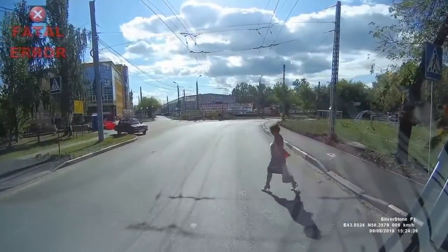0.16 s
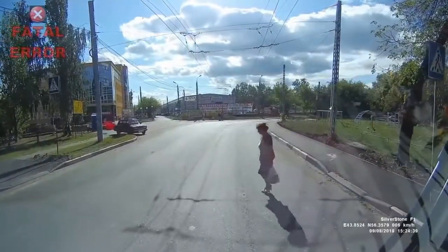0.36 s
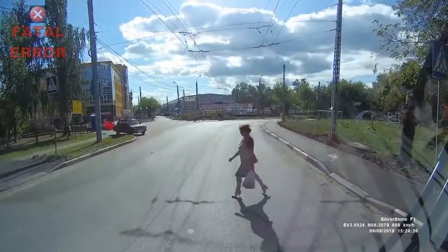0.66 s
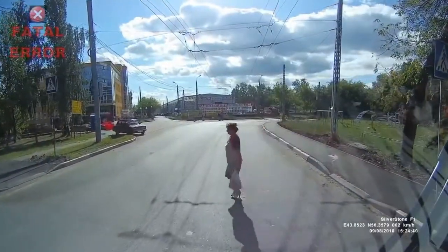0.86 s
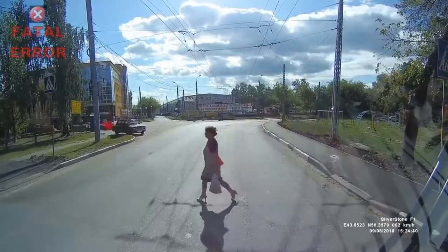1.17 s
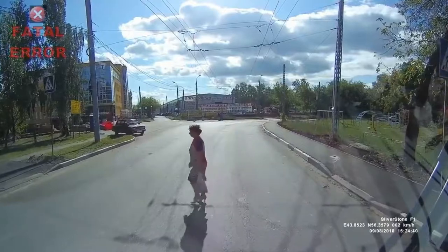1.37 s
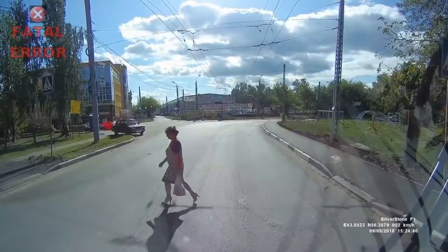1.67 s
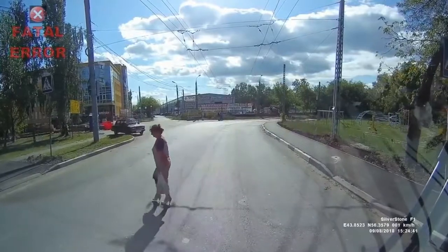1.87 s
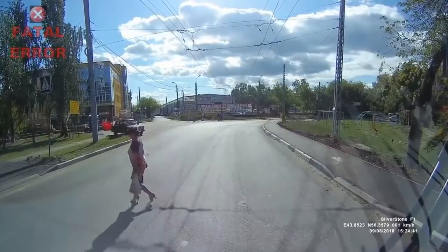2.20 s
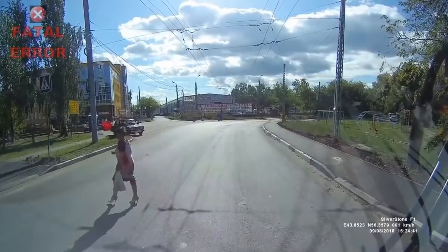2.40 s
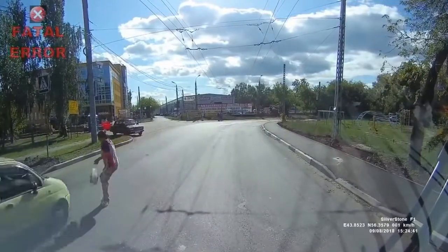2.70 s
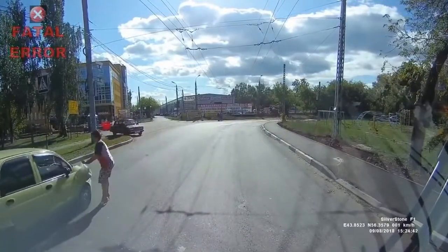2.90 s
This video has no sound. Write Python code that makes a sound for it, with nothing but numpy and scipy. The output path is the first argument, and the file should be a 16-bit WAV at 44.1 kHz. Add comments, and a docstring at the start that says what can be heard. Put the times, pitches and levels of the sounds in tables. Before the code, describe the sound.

Tyres squeal as a nearby car brakes hard, heard over an idling engine from inside.

```python
"""Inside a car that has all but stopped, a four-cylinder engine idles, throbbing in the cab;
loose things knock softly in the first second. At 1.4 s the engine starts a brief rev.
From 2 s, as it sinks back, another car brakes hard alongside: two skidding tyres stick and slip,
squealing at neighbouring, unsteady pitches, echoed by the street.
Near 2.9 s the lower one ends in a falling chirp while the higher one squeals on."""
import sys
import numpy as np
from scipy import signal
from scipy.fft import rfft, irfft, next_fast_len
from scipy.io import wavfile
from scipy.ndimage import map_coordinates

SR = 44100
rng = np.random.default_rng(int(sys.argv[2]) if len(sys.argv) > 2 else 0)


def store_pcm(level_fs):
    """Save levels as 16-bit WAV."""
    pcm = np.round(np.clip(level_fs, -1, 1) * 32767).astype(np.int16)
    wavfile.write(sys.argv[1], SR, np.atleast_2d(pcm).T)


N = 134505
TIME = np.arange(N) / SR


def amp(db):
    """Decibels to gain."""
    return 10 ** (np.asarray(db) / 20)


def unit(x):
    """Scale to rms 1."""
    return x / np.sqrt(np.mean(x ** 2) + 1e-20)


def curves(rows):
    """One value per sample for each column after the time."""
    times, *columns = np.transpose(rows)
    return [np.interp(TIME, times, column) for column in columns]


def wobble(rate):
    """A smooth random curve, rate knots a second."""
    return map_coordinates(rng.standard_normal(4096), [TIME * rate], mode="wrap")


def filtered(x, response):
    """EQ x with a gain given as a function of frequency."""
    size = next_fast_len(N + SR // 2)
    return irfft(rfft(x, size) * response(np.fft.rfftfreq(size, 1 / SR)), size)[:N]


def high_cut(x, cutoff_hz):
    """A very steep low-pass."""
    return filtered(x, lambda hz: 1 / np.sqrt(1 + (hz / cutoff_hz) ** 60))


def noise(spectrum):
    """Noise of rms 1 coloured by (f/Hz, level/dB) points."""
    freqs, db = np.transpose(spectrum)
    white = rng.standard_normal(N)
    return unit(filtered(white, lambda hz: amp(np.interp(np.log(hz + 1), np.log(freqs), db))))


# small knocks and rattles in the cab: t/s, f/Hz, spread/octaves, level/dB, spread/s
KNOCKS = [(.513, 330, .7, -38, .005), (.529, 600, .35, -45, .008), (.821, 3600, .2, -52, .006),
          (.825, 750, .35, -46, .008)]


def knocks():
    """Loose things in the cab shift with a short puff of noise each."""
    out = np.zeros(N)
    for at, centre, octaves, db, width in KNOCKS:
        white = rng.standard_normal(N)
        band = filtered(white, lambda hz: np.exp(-.5 * (np.log2((hz + 1) / centre) / octaves) ** 2))
        out += amp(db) * unit(band) * np.exp(-.5 * ((TIME - at) / width) ** 2)
    return out


# engine speed from idle to rev and back, as firing rate: t/s, f/Hz
FIRING_RATE = [(0, 25.15), (1.4, 25.02), (1.55, 30.78), (1.75, 40.3), (1.9, 42.95), (2.08, 45.03),
               (2.25, 39.28), (2.45, 33.1), (2.75, 27.39), (3.05, 24.94)]


def firings(first_thump_s=.069):
    """The engine's clock: a running count of firings, zero at the first thump."""
    count = np.cumsum(curves(FIRING_RATE)[0]) / SR
    return count - count[round(first_thump_s * SR)]


# clack pattern over two firings: position/cycles, relative level/dB, decay/s
CLACK_PATTERN = [(.76, -1, .013), (.27, -7, .014)]
# colour of a clack: f/Hz, relative level/dB
CLACK_EQ = [(500, -17), (800, -4), (1200, 0), (1700, -7), (2200, -22), (2900, -16.5), (4300, -17.5),
            (4850, -42), (7500, -52)]


def valve_clacks(count, level_db=-40.5, attack_s=.004):
    """The valve gear clacks at fixed points of each cycle: sharp noise bursts of uneven strength."""
    rate, = curves(FIRING_RATE)
    power = np.zeros(N)
    for place, db, decay in CLACK_PATTERN:
        cycles = count / 2 - place
        hit_db = db + rng.standard_normal(128)[np.floor(cycles).astype(int)]
        age = (cycles % 1) * 2 / rate
        envelope = np.exp(-age / decay) * (1 - np.exp(-age / attack_s))
        power += (amp(hit_db) * envelope) ** 2
    return amp(level_db) * np.sqrt(power) * noise(CLACK_EQ)


# throttle ride, scaled separately for rush and roar: t/s, unscaled level/dB
THROTTLE = [(0, 1.5), (1.35, 2.3), (1.6, 5), (1.8, 8.5), (2.05, 8.5), (2.25, 5.5), (2.5, 3.5), (3.05, 1)]
# colours of the mechanical rush and the intake roar: f/Hz, relative level/dB
RUSH_EQ = [(30, 0.5), (180, 2.5), (260, -11), (500, -10.5), (800, -7), (1200, -1.5), (1700, -9),
           (2200, -24.5), (2900, -22.5), (4400, -21), (4850, -38.5), (6200, -38.5), (7500, -49)]
INTAKE_EQ = [(40, -7.5), (110, 18.5), (220, 6.5), (300, 2), (750, -1), (1100, -10), (2000, -48.5)]


def engine_rush(count, rush_db=-45, intake_db=-45.5):
    """Mechanical rush and intake roar pulse with each firing; the throttle lifts the roar most."""
    throttle, = curves(THROTTLE)
    pulse_db = 1.3 * np.cos(2 * np.pi * (count + .3))  # crests just ahead of the firing
    rush = amp(rush_db + .91 * throttle + pulse_db) * noise(RUSH_EQ)
    roar = amp(intake_db + 1.514 * throttle + pulse_db) * noise(INTAKE_EQ)
    return rush + roar


# fader ride of the boom's fundamental: t/s, level/dB
BOOM_LEVEL = [(0, -36.5), (1.5, -35.5), (1.6, -40), (1.79, -29), (2.05, -26), (2.19, -27.5), (2.45, -40),
              (2.55, -36), (2.76, -41), (2.95, -35), (3.05, -37)]
# harmonics of the boom: multiple of the firing rate, relative level/dB
BOOM_ORDERS = [(1, 0), (3, -15), (4, -26.5), (5, -19)]


def cab_boom(count):
    """The low end: the cab booms at the firing rate and a few of its multiples."""
    boom = -sum(amp(db) * np.cos(2 * np.pi * order * count) for order, db in BOOM_ORDERS)
    return np.sqrt(2) * amp(curves(BOOM_LEVEL)[0]) * boom


# the cab's drones at idle, strong and weak in turn: level/dB, length/s
DRONES = [(-31, 0.041), (-37.5, 0.028)]
DRONE_HZ, DRONE_FLAT_HZ, DRONE_SETTLE_S = 189.3, 52.9, .014  # starts flat, settles on its pitch
THUMP_DB, THUMP_WIDTH_S = -23, .0015
PANEL_HZ, PANEL_DB, PANEL_T60_S = 364.2, -40, .072


def cab_throb(count, idle_hz=25.1):
    """The cab drones after each firing; every second one also thumps and sets a panel ringing."""
    t = np.arange(-SR // 8, SR // 8 + 1) / SR  # centred on the blow
    hz = DRONE_HZ - DRONE_FLAT_HZ * np.exp(-(t / DRONE_SETTLE_S) ** 2)
    drone = -np.cos(2 * np.pi * np.cumsum(hz * (t > 0)) / SR)
    thump = -amp(THUMP_DB) * np.exp(-.5 * (t / THUMP_WIDTH_S) ** 2)
    panel = amp(PANEL_DB - 60 * np.abs(t) / PANEL_T60_S) * np.sin(2 * np.pi * PANEL_HZ * t) * (t > 0)
    at = np.flatnonzero(np.diff(np.floor(count)))
    force = (idle_hz / curves(FIRING_RATE)[0][at]) ** .9  # quicker firings, weaker blows
    out = np.zeros(N)
    for turn, (db, length) in enumerate(DRONES):
        on_turn = np.floor(count[at + 1]) % 2 == turn
        blows = np.zeros(N)
        blows[at] = force * amp(.5 * rng.standard_normal(len(at))) * on_turn
        swell = amp(db) * np.sin(np.pi * np.clip(t / length, 0, 1))
        response = swell * drone + (thump + panel) * (turn == 0)
        out += signal.fftconvolve(blows, response, "same")
    return out


def street_echo(x, t60_s=.28):
    """A short diffuse echo from road, houses and cab."""
    t = np.arange(SR // 2) / SR
    tail = rng.standard_normal(len(t)) * amp(-60 * t / t60_s)
    return signal.fftconvolve(x, tail / np.linalg.norm(tail))[:N]


def strength(tyre):
    """Gain of a tyre's squeal, silent until it starts to skid."""
    times, _, db = np.transpose(tyre)
    return amp(np.interp(TIME, times, db, left=-120))


# colour of the scrub: f/Hz, relative level/dB
SCRUB_EQ = [(300, -44.5), (500, -42), (850, -20), (1050, -5.5), (1230, 8.5), (1420, -2.5), (1580, 1.5),
            (1750, -6.5), (2150, -34), (2450, -36), (3000, -27), (3550, -41), (4300, -33), (5000, -80)]
STRONG_SQUEAL_DB = -17


def tread_scrub(level_db=-28):
    """The sliding tread scrubs, rising half a dB for each dB of squeal."""
    force = np.hypot(strength(LOW_TYRE), strength(HIGH_TYRE)) / amp(STRONG_SQUEAL_DB)
    return amp(level_db) * np.sqrt(force) * noise(SCRUB_EQ)


# colour of the rasp: f/Hz, relative level/dB
RASP_EQ = [(1500, -4.5), (2000, -7), (2500, 3), (3050, 11), (3550, 0), (4100, -0.5), (4600, -15),
           (4900, -58.5)]
# its fader ride: t/s, relative level/dB
RASP_LEVEL = [(2.09, -81), (2.13, -59), (2.22, -47), (2.27, -52.5), (2.355, -51.5), (2.42, -38),
              (2.48, -49.5), (2.62, -43), (2.72, -41), (2.9, -45), (3.0, -40)]


def tread_rasp():
    """The tread's harsh edge, heard more as the car comes alongside."""
    return amp(curves(RASP_LEVEL)[0]) * noise(RASP_EQ)


def squeal(tyre, tread, overtones, jitter=.018, flutter_db=3.2, smear_rad=1.15):
    """Each size of tread block sticks and slips: fluttering, raspy tones, purer as the screech grows."""
    hz, db = curves(tyre)
    looseness = amp(-.35 * np.maximum(db - STRONG_SQUEAL_DB, 0))
    out = np.zeros(N)
    for ratio, block_db in tread:
        pitch = ratio * hz * (1 + looseness * jitter * wobble(rate=190))
        phase = 2 * np.pi * np.cumsum(pitch) / SR
        tone = np.sin(phase)
        for order, level in overtones:  # phase scatter tears them into a rasp
            tone += amp(level) * np.sin(order * phase + smear_rad * wobble(rate=480))
        gain = amp(block_db + looseness * flutter_db * wobble(rate=120))
        out += tone * gain * (1 if ratio == 1 else looseness)
    return strength(tyre) * unit(out)


# the low tyre bites in swooping chirps, the high one holds steadier: t/s, f/Hz, relative level/dB
LOW_TYRE = [(2.045, 1460, -44), (2.07, 1370, -33), (2.088, 1290, -24), (2.105, 1270, -32),
            (2.145, 1300, -22), (2.17, 1295, -23.5), (2.195, 1290, -35), (2.225, 1450, -35),
            (2.243, 1390, -27), (2.253, 1340, -14.5), (2.274, 1290, -9.5), (2.293, 1230, -23),
            (2.31, 1190, -9.5), (2.33, 1180, -17), (2.355, 1165, -18.5), (2.393, 1175, -9),
            (2.408, 1190, -19), (2.455, 1250, -27), (2.485, 1250, -22), (2.612, 1260, -26),
            (2.632, 1190, -15), (2.67, 1220, -16), (2.695, 1240, -21), (2.752, 1245, -18), (2.8, 1240, -25),
            (2.868, 1270, -30), (2.875, 1245, -12.5), (2.9, 1110, -27), (2.92, 950, -33), (2.934, 830, -28),
            (2.955, 780, -50)]
HIGH_TYRE = [(2.055, 1430, -45), (2.09, 1400, -26), (2.16, 1390, -20), (2.22, 1400, -33),
             (2.255, 1400, -26), (2.28, 1410, -15.5), (2.305, 1390, -22), (2.345, 1350, -28),
             (2.405, 1400, -21), (2.428, 1395, -15), (2.465, 1395, -19), (2.52, 1390, -15),
             (2.575, 1375, -15), (2.62, 1385, -18), (2.66, 1380, -24), (2.71, 1380, -23.5),
             (2.765, 1400, -18), (2.82, 1390, -22.5), (2.92, 1375, -24), (2.97, 1405, -22),
             (3.05, 1420, -23)]
# tone clusters of the tread blocks: ratio to the tyre's pitch, relative level/dB
LOW_TREAD = [(.78, -25), (.89, -15), (.96, -11), (1, 0), (1.05, -13)]
HIGH_TREAD = [(.955, -12), (1, 0), (1.06, -8), (1.135, -16)]
# overtones on each of those tones: harmonic number, relative level/dB
LOW_OVERTONES = [(2, -25.5), (3, -40)]
HIGH_OVERTONES = [(2, -23.5), (3, -33)]


def skid():
    """Both tyres squeal over the noise of their tread, dulled by the cab."""
    grit = tread_scrub() + tread_rasp()
    low = squeal(LOW_TYRE, LOW_TREAD, LOW_OVERTONES)
    high = squeal(HIGH_TYRE, HIGH_TREAD, HIGH_OVERTONES)
    return high_cut(grit + low + high, cutoff_hz=4650)


def scene(direct_db=-1.3, echo_db=-7.5):
    """The engine close by, the skid and its echo outside."""
    count = firings()
    tyres = skid()
    engine = cab_boom(count) + cab_throb(count) + engine_rush(count) + valve_clacks(count)
    return (engine + knocks() + amp(direct_db) * tyres + amp(echo_db) * street_echo(tyres))[None]


def record(dry, low_cut_hz=17, fade_s=.004):
    """Master: trim the deepest bass, fade the very end and cut the top."""
    trimmed = filtered(dry[0], lambda hz: hz ** 4 / (hz ** 4 + low_cut_hz ** 4))
    fade = np.minimum(TIME[::-1] / fade_s, 1)
    return high_cut(trimmed * fade, cutoff_hz=7300)[None]


dry = scene()
out = record(dry)
store_pcm(out)
```